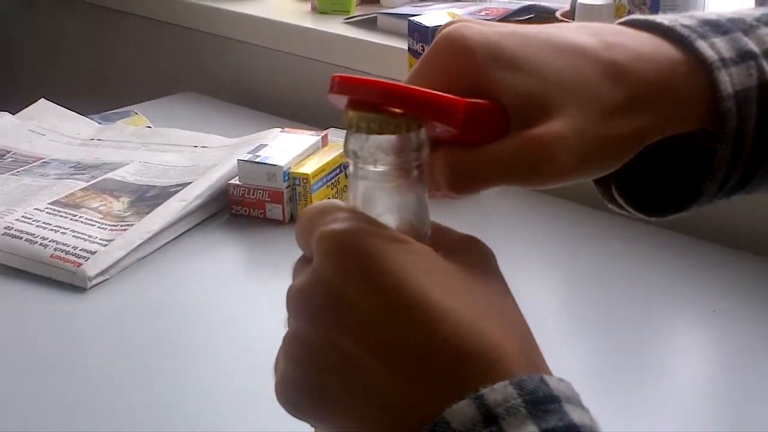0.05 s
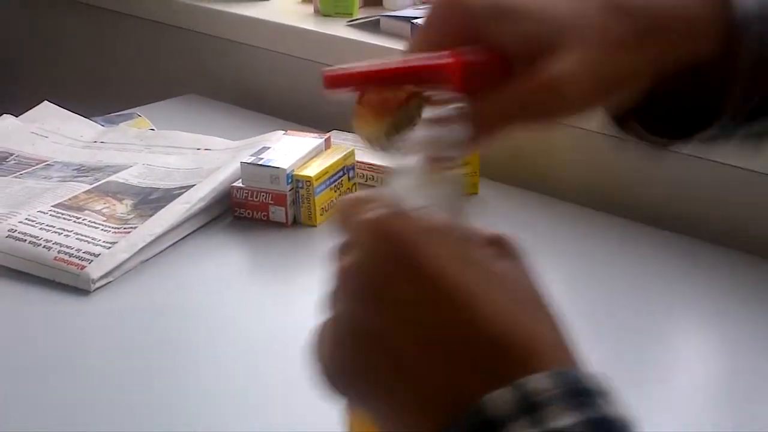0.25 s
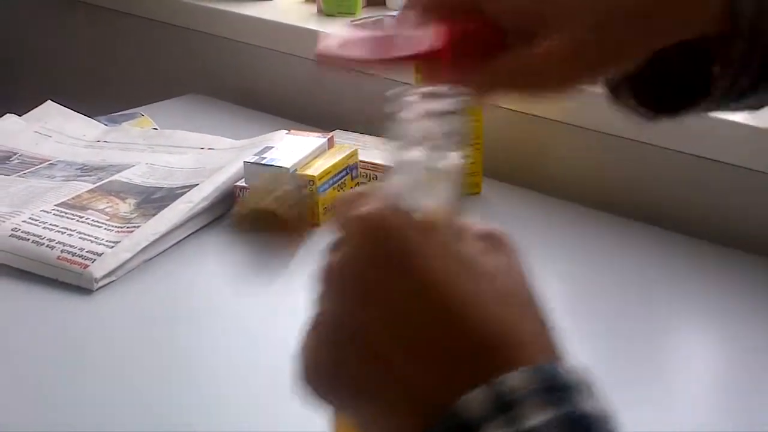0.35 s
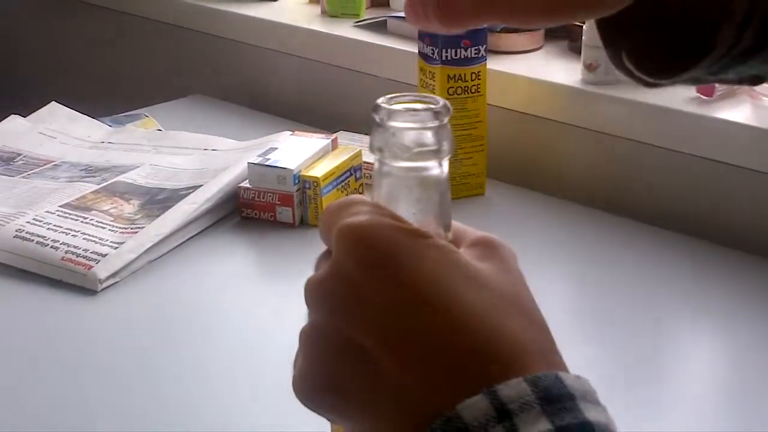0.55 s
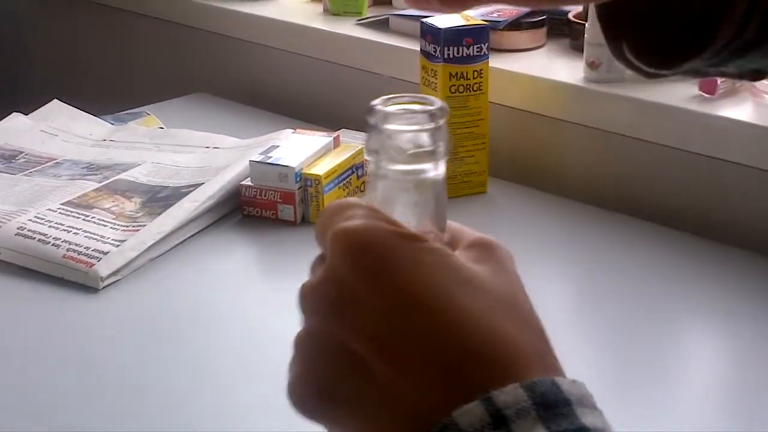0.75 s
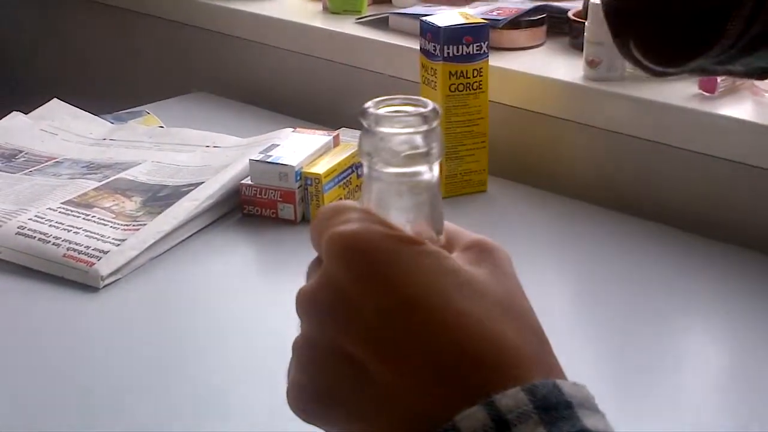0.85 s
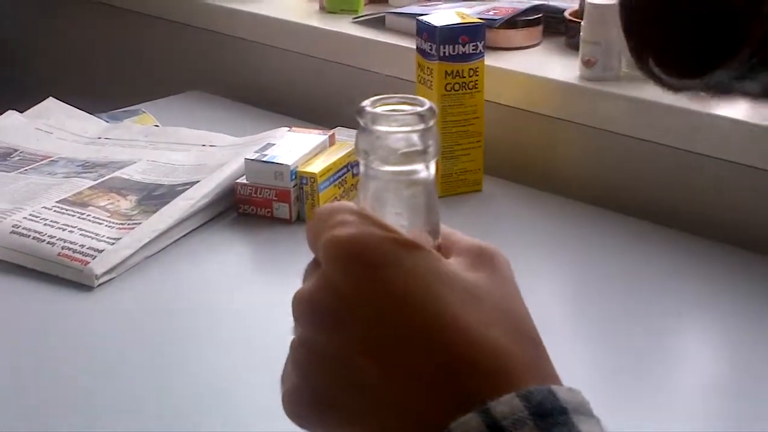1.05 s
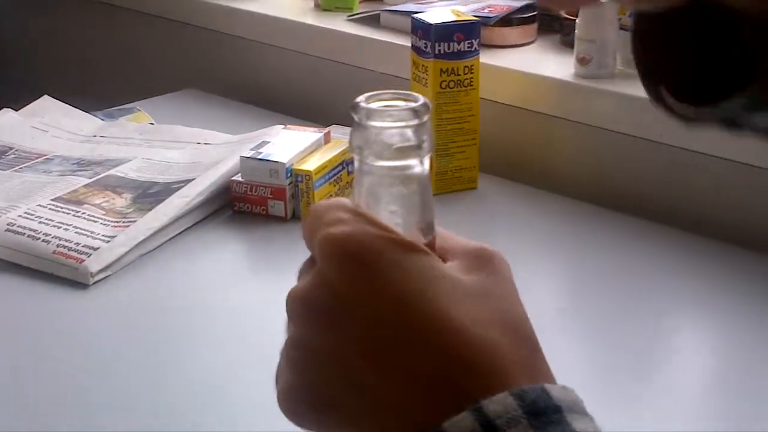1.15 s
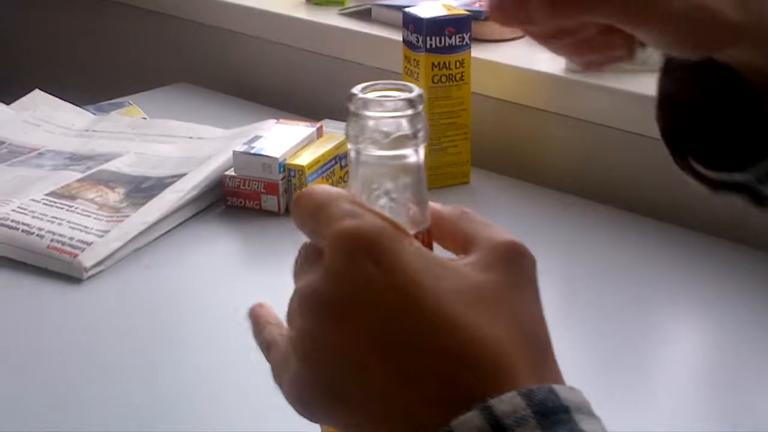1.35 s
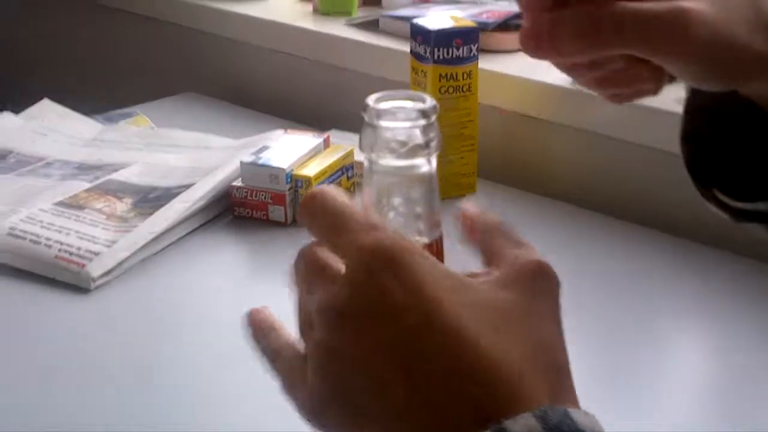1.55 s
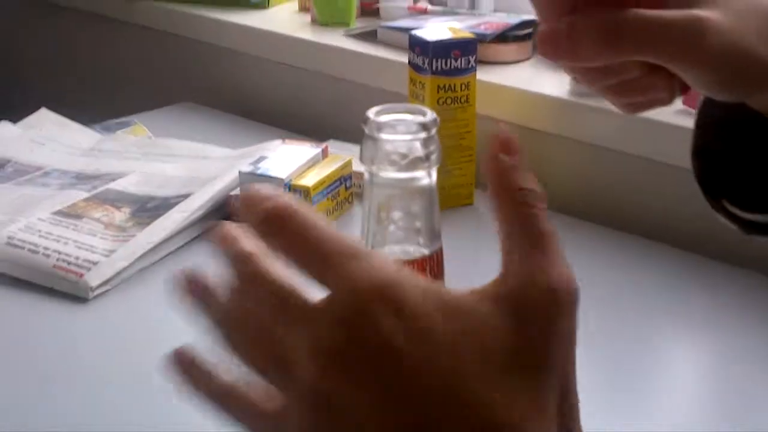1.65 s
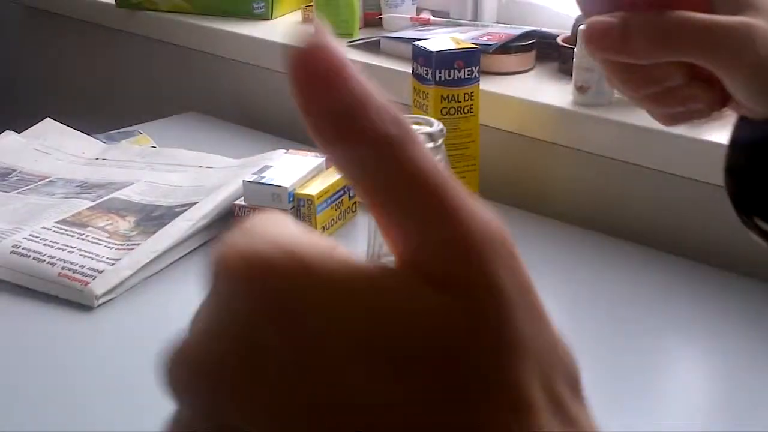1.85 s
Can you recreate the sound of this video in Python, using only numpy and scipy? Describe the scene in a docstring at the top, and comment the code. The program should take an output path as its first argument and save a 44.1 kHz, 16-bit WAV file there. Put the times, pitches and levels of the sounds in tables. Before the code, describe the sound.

A glass bottle pops open and its metal cap bounces and rolls on a table.

```python
"""Opening a glass bottle

A crown cap is levered off in a small, live room: a metal snap and a hollow pop of gas from the neck.
The bottle knocks down on the table. The cap bounces, ringing, in hops that shrink to a clatter, then
rolls away, wobbling and ticking on its crimped rim, while the bottle is nudged across the table top."""
import sys
import numpy as np
from scipy import signal
from scipy.fft import rfft, irfft
from scipy.io import wavfile

SR = 44100
rng = np.random.default_rng(int(sys.argv[2]) if len(sys.argv) > 2 else 0)


def file_out(sig):
    """Save sig as 16-bit WAV at sys.argv[1]."""
    # one column per channel
    cols = np.atleast_2d(sig).T
    # limit, then scale
    lim = np.clip(cols, -1, 1)
    pcm = np.round(lim * 32767).astype(np.int16)
    wavfile.write(sys.argv[1], SR, pcm)


N = 83790


def undb(db):
    """Decibels to gain."""
    return 10 ** (np.asarray(db) / 20)


def along(points, x):
    """Read a breakpoint curve on a logarithmic axis."""
    positions, values = np.array(points, float).T
    return np.interp(np.log(np.maximum(x, positions[0])), np.log(positions), values)


def fade(t60, size=N):
    """Exponential decay, down 60 dB after t60 seconds."""
    return np.exp(-np.log(1000) * np.arange(size) / SR / t60)


def unit(x):
    """Scale to unit energy."""
    return x / np.sqrt(np.sum(x ** 2))


def response(eq, scale=1, size=4096):
    """Minimum-phase impulse of unit energy, shaped by an EQ curve."""
    curve_db = along(eq, np.fft.rfftfreq(size, 1 / SR) / scale)
    cepstrum = irfft(curve_db * np.log(10) / 20)
    cepstrum[1:size // 2] *= 2
    cepstrum[size // 2 + 1:] = 0
    return unit(irfft(np.exp(rfft(cepstrum))))


def through(x, impulse):
    """Convolve and keep the scene's length."""
    return signal.fftconvolve(x, impulse)[:N]


def burst(eq, decay_s, size=8192):
    """A noise hit: dying noise, flattened in spectrum, faded again and shaped by an EQ curve."""
    noise = rng.standard_normal(size) * fade(decay_s, size)
    flat = irfft(np.exp(1j * np.angle(rfft(noise))))
    return unit(through(flat * fade(4 * decay_s, size), response(eq)))


def add(out, s, x):
    """Mix x in at s seconds."""
    i = int(np.clip(s * SR, 0, N - 1))
    out[i:i + len(x)] += x[:N - i]


def ring(modes, size=N // 2):
    """Struck resonances: one damped sine per mode."""
    t = np.arange(size) / SR
    return sum(undb(db) * fade(t60, size) * np.sin(2 * np.pi * hz * t) for hz, db, t60 in modes)


# EQ of the room's air (frequency [Hz], relative level [dB])
AIR_EQ = [(20, -4), (60, -2), (110, -6.5), (220, -2), (400, -7.5), (600, -7.5), (1200, -15.5), (2000, -18),
          (2700, -12.5), (3500, -25.5), (7000, -27), (15000, -28.5)]
AIR_DB, WHINE_HZ, WHINE_DB = -57.5, 7580, -72

def room_tone():
    """A quiet bed of air with a faint, steady whine."""
    air = through(rng.standard_normal(N), response(AIR_EQ))
    whine = np.sin(2 * np.pi * WHINE_HZ * np.arange(N) / SR)
    return undb(AIR_DB) * air + undb(WHINE_DB) * whine


# reverb time by band (frequency [Hz], T60 [s])
ROOM_DECAY = [(100, 0.41), (300, 0.46), (800, 0.64), (2000, 0.63), (5000, 0.51), (9000, 0.48),
              (15000, 0.21)]

def room_reverb(build_s=.0058):
    """The room's impulse response: a diffuse tail whose top end dies first."""
    t, hz = np.arange(N) / SR, np.fft.rfftfreq(N, 1 / SR)
    spectrum, tail = rfft(rng.standard_normal(N)), 0
    for centre, t60 in ROOM_DECAY:
        band = along([(f, f == centre) for f, _ in ROOM_DECAY], hz)
        tail = tail + irfft(spectrum * band, N) * fade(t60)
    return unit(tail * (1 - np.exp(-t / build_s)))


# envelope of the bottle's slide (time [s], level [dB])
SCUFF_ENVELOPE = [(1.32, -61), (1.38, -57), (1.411, -39.5), (1.449, -42.5), (1.48, -43.5), (1.5, -46.5),
                  (1.539, -50.5), (1.6, -88)]
# EQ of glass rubbing the table (frequency [Hz], relative level [dB])
SCUFF_EQ = [(50, -10.5), (115, 7), (175, -5), (270, 1.5), (420, 3.5), (600, -6.5), (900, -5.5), (1400, -18),
            (4000, -39)]

def bottle_scuff(slip_hz=300):
    """The bottle's base sticks and slips on the table top in an uneven train of tiny jolts."""
    slips = np.zeros(N)
    times, levels = np.array(SCUFF_ENVELOPE).T
    s = times[0]
    for gap, strength in rng.uniform(.59, 1.5, (N // 400, 2)):
        add(slips, s, [strength * undb(np.interp(s, times, levels, right=-np.inf))])
        s += gap / slip_hz
    return through(slips, response(SCUFF_EQ)) * np.sqrt(SR / slip_hz)


# the bottle's hits on the table (time [s], level [dB])
THUD_HITS = [(0.45, -5.5), (.456, 1), (.465, -7.5)]
# EQ of a dull thud (frequency [Hz], relative level [dB])
THUD_EQ = [(50, -8), (150, -9), (300, 2.5), (460, 8), (700, -4.5), (950, 6), (1400, -12), (3000, -25),
           (9000, -45), (16000, -50)]
# low resonances of the soft bump (frequency [Hz], relative level [dB], T60 [s])
BUMP_RESONANCES = [(112.7, -4, 0.33), (129, -12, 0.3)]
THUD_SEND_DB, BUMP_S, BUMP_DB = -.5, .842, -44

def bottle_thuds(reverb):
    """The bottle comes down on the table in quick, dull knocks; a soft, dry bump follows."""
    knocks = np.zeros(N)
    for s, db in THUD_HITS:
        add(knocks, s, undb(db) * burst(THUD_EQ, decay_s=.028))
    out = knocks + undb(THUD_SEND_DB) * through(knocks, reverb)
    add(out, BUMP_S, undb(BUMP_DB) * ring(BUMP_RESONANCES))
    return out


# the cap's bright partials, plus a faint, longer 1990 Hz ring, probably bottle or room (frequency [Hz])
CONTACT_PITCHES = [1990, 3510, 4600, 5630, 6380, 7470, 8560, 9310, 10730, 13478, 14220, 15130]
# how each of them rings (relative level [dB], base T60 [s])
CONTACT_RINGS = [(-30.5, 0.27), (-14.5, 0.02), (-24, 0.11), (-3, 0.077), (-25, 0.067), (-28, .1),
                 (-10.5, 0.028), (-16, 0.043), (-21.5, 0.031), (-9.5, 0.034), (-19, .04), (-14.5, 0.016)]
MIDDLE_FROM_HZ, TOP_FROM_HZ = 7000, 10000

def contact_ring(middle_db, top_db, decay_factor):
    """Bright cap partials over a faint lower ring; the spot struck sets the share of the upper ones."""
    modes = []
    for hz, (db, t60) in zip(CONTACT_PITCHES, CONTACT_RINGS):
        trim_db = top_db if hz > TOP_FROM_HZ else middle_db if hz > MIDDLE_FROM_HZ else 0
        modes.append((hz, db + trim_db, t60 * decay_factor))
    return ring(modes, size=N // 4)


# EQ of a tooth's tick (frequency [multiple of its pitch], relative level [dB])
TICK_EQ = [(.02, -30.5), (.2, -6.5), (.38, -19), (.55, -10.5), (.95, 1.5), (1.25, 4), (1.5, -14.5),
           (2.2, -20.5), (2.6, -56), (4, -26)]

def tooth_tick(hz, grit_db=-1):
    """One tooth of the rim meets the table: a crisp pulse layered with grit."""
    grit_eq = [(ratio * hz, db) for ratio, db in TICK_EQ]
    out = undb(grit_db) * burst(grit_eq, decay_s=.0029, size=1024)
    add(out, 0, response(TICK_EQ, hz))
    return out


# wobbles of the rolling cap (time [s], tick level [dB], spread [s], pitch [Hz], ring level [dB])
WOBBLE_HITS = [(1.2976, -19, .001, 3860, -28), (1.305, -14, .002, 4360, -23.5),
               (1.3364, -26, 0.0025, 4640, -35), (1.3421, -43, 0.0008, 4330, -38),
               (1.386, -16.5, .005, 4100, -50), (1.396, -23.5, 0.0033, 4120, -24.5),
               (1.4408, -20.5, 0.00017, 4200, -54), (1.468, -30, 0.000926, 4220, -25.5),
               (1.475, -14.5, 0.0029, 4200, -34), (1.506, -32, 0.00053, 4250, -29.5),
               (1.519, -24, 0.0026, 4140, -36), (1.5487, -15.5, .002, 3940, -24.5),
               (1.583, -23, .003, 4100, -39), (1.6162, -17, .004, 3860, -31),
               (1.6723, -15.5, 0.00074, 3700, -24.5), (1.7208, -16, 0.00069, 3400, -28),
               (1.7334, -28, 0.00092, 3400, -38), (1.748, -24.5, 0.0046, 3000, -27.5),
               (1.76, -33, .003, 3140, -61)]
# envelope of the roll (time [s], tick level [dB])
ROLL_ENVELOPE = [(1.17, -24), (1.25, -18.5), (1.33, -24), (1.42, -31.5), (1.522, -20.5), (1.6, -29),
                 (1.69, -41), (1.77, -28.5)]
RUN_TICKS, RUN_DB = 4, -1.5
TEETH_PER_S, TOOTH_JITTER, TOOTH_PITCH_HZ, TOOTH_RING_DB = 115, .25, 4200, -16.5

def cap_roll():
    """The rim's teeth tick on the table one by one, and in a quick run at each wobble."""
    out = np.zeros(N)
    note = contact_ring(middle_db=1, top_db=-12, decay_factor=.61)
    for s, db, spread, hz, ring_db in WOBBLE_HITS:
        add(out, s, undb(ring_db) * note)
        add(out, s, undb(db) * tooth_tick(hz))
        for offset in rng.uniform(-2, 2, RUN_TICKS):
            add(out, s + offset * spread, undb(db + RUN_DB) * tooth_tick(hz))
    times, levels = np.array(ROLL_ENVELOPE).T
    s = times[0]
    for stumble, _ in rng.standard_normal((N // 600, 2)):
        tick = tooth_tick(TOOTH_PITCH_HZ)
        if s < times[-1]:
            gain = undb(np.interp(s, times, levels))
            add(out, s, gain * tick)
            add(out, s, gain * undb(TOOTH_RING_DB) * note)
        s += np.exp(TOOTH_JITTER * stumble) / TEETH_PER_S
    return out


# the cap's landings (time [s], ring [dB], middle trim [dB], top trim [dB], click [dB], knock [dB])
LANDINGS = [(0.545, -20, 1, 3.5, -7, -6), (0.7658, -15, -2, 2, -5.5, -7.5),
            (0.9972, -11, 1, -14, -1.5, -10), (1.1323, -13, -10.5, -34, -5.5, -16),
            (1.161, -14.5, -3.5, -26, -0.5, -20.5), (1.1869, -13.5, -16, -18, -13, -26.5),
            (1.214, -18, -0.5, -18, -2.5, -21.5), (1.228, -31.5, 8.5, -5, -13.5, -26)]
# a high hop rings longer than a quick clatter (hop length [s], decay time [factor])
HOP_SUSTAIN = [(.03, .85), (.22, 1.35)]
# EQ of the bright contact click (frequency [Hz], relative level [dB])
CLICK_EQ = [(300, -47), (1400, -37), (2100, 5.5), (3400, 7.5), (5400, 13.5), (6800, 4), (9000, -1),
            (11000, -10), (15500, -15)]
# EQ of the table's knock under the cap (frequency [Hz], relative level [dB])
KNOCK_EQ = [(60, -42), (200, -11), (350, -5), (650, -1.5), (950, 1), (1250, -5), (1700, -11.5), (4000, -12),
            (16000, -44)]
RING_SEND_DB, CLICK_SEND_DB, KNOCK_SEND_DB, KNOCK_DRY_DB = -6, -7.5, 2.5, 1.5
CHOKE_S, WALL_ECHO_S, WALL_ECHO_DB = .003, .0175, -12

def cap_bounces(reverb):
    """Each landing clicks, knocks the table and starts a fresh ring, choking the one before it."""
    rings, click, knock = np.zeros((3, N))
    next_times = [row[0] for row in LANDINGS[1:]] + [N / SR]
    for (s, ring_db, middle_db, top_db, click_db, knock_db), next_s in zip(LANDINGS, next_times):
        note = undb(ring_db) * contact_ring(middle_db, top_db, along(HOP_SUSTAIN, next_s - s))
        since_next_s = np.maximum(s + np.arange(len(note)) / SR - next_s, 0)
        add(rings, s, note * np.exp(-since_next_s / CHOKE_S))
        add(click, s, undb(click_db) * burst(CLICK_EQ, decay_s=.027))
        add(knock, s, undb(knock_db) * burst(KNOCK_EQ, decay_s=.057))
    send = undb(RING_SEND_DB) * rings + undb(CLICK_SEND_DB) * click + undb(KNOCK_SEND_DB) * knock
    out = rings + click + undb(KNOCK_DRY_DB) * knock + through(send, reverb)
    add(out, WALL_ECHO_S, undb(WALL_ECHO_DB) * (rings + click))
    return out


# opener and cap snapping off the glass lip (time [s], click level [dB], ring level [dB])
SNAP_HITS = [(.2456, -8, -20.5), (.2482, -0.5, -32), (.271, -40, -40), (0.2905, -18, -34)]
# EQ of a metal snap (frequency [Hz], relative level [dB])
SNAP_EQ = [(300, -11), (1500, -5.5), (2600, 6.5), (3700, -6), (5600, -2), (7000, -16), (9000, -9),
           (11000, -8.5), (15000, -16)]
# tight ring of the cap held in the opener (frequency [Hz], relative level [dB], T60 [s])
HELD_CAP_MODES = [(5880, -13.5, .03), (8850, -5, 0.023), (9270, -10.5, 0.037), (13500, -15, .04)]

def opener_snap():
    """The crimp snaps over the lip and the cap rattles in the opener."""
    out = np.zeros(N)
    for s, click_db, ring_db in SNAP_HITS:
        add(out, s, undb(click_db) * burst(SNAP_EQ, decay_s=.027))
        add(out, s, undb(ring_db) * ring(HELD_CAP_MODES))
    return out


# EQ of the hollow pop (frequency [Hz], relative level [dB])
POP_EQ = [(40, -54), (85, -26), (160, -17), (260, -9), (400, -5.5), (560, -10.5), (840, -3), (1100, -13),
          (1600, -22), (2800, -39.5), (5000, -37), (16000, -49)]
# resonances of the bottle's air and the room (frequency [Hz], level [dB], T60 [s])
POP_RESONANCES = [(117.8, -28, 0.84), (137.4, -35, 0.76), (392, -23, 0.35), (800.6, -24, 0.18),
                  (936, -30, 0.43)]
POP_S, POP_DB, POP_SEND_DB = .2478, 6, 5.5

def gas_pop(reverb):
    """Gas bursts from the neck and sets the air in the bottle and the room ringing."""
    gas, body = np.zeros((2, N))
    add(gas, POP_S, undb(POP_DB) * burst(POP_EQ, decay_s=.045))
    add(body, POP_S, ring(POP_RESONANCES, size=N))
    return gas + body + undb(POP_SEND_DB) * through(gas, reverb)


SNAP_SEND_DB, ROLL_SEND_DB, SCUFF_SEND_DB = -7.5, -7, -1

def scene():
    """The mono mix: bottle, cap and gas share one reverb, over the room tone."""
    reverb = room_reverb()
    snap, roll, scuff = opener_snap(), cap_roll(), bottle_scuff()
    send = undb(SNAP_SEND_DB) * snap + undb(ROLL_SEND_DB) * roll + undb(SCUFF_SEND_DB) * scuff
    hits = gas_pop(reverb) + bottle_thuds(reverb) + cap_bounces(reverb)
    return (hits + snap + roll + scuff + through(send, reverb) + room_tone())[None]


def record(dry):
    """A steep high cut at 16 kHz on the whole mix."""
    return signal.sosfilt(signal.ellip(8, .2, 80, 16000, fs=SR, output="sos"), dry)


dry = scene()
out = record(dry)
file_out(out)
```